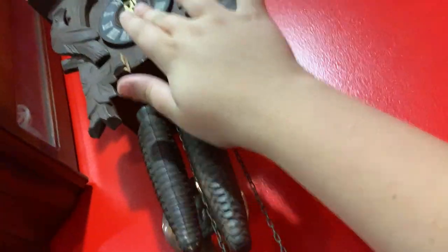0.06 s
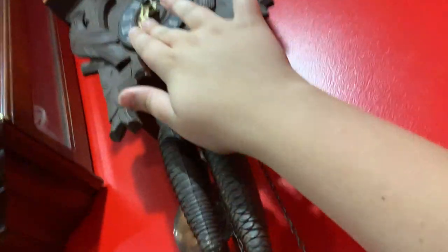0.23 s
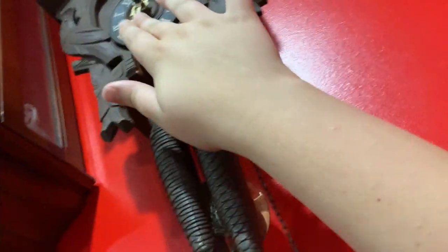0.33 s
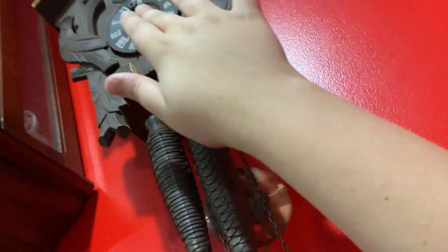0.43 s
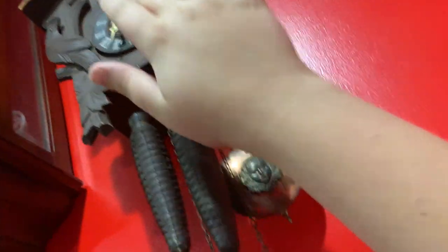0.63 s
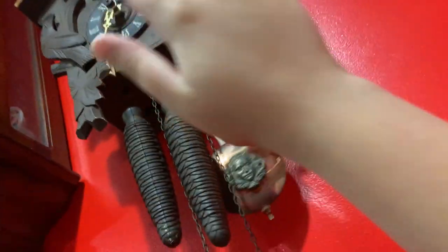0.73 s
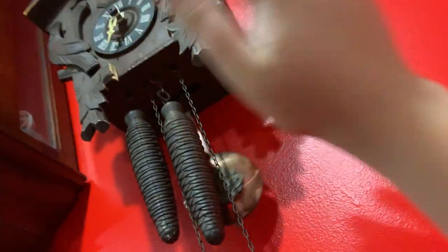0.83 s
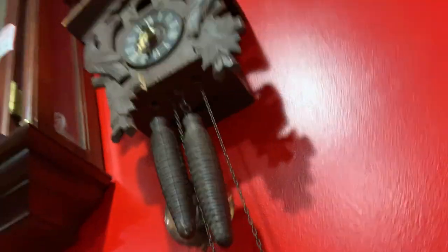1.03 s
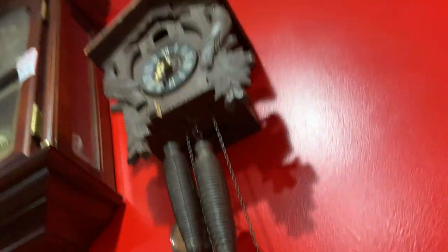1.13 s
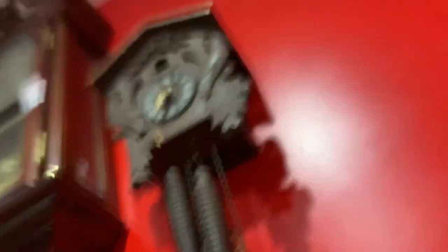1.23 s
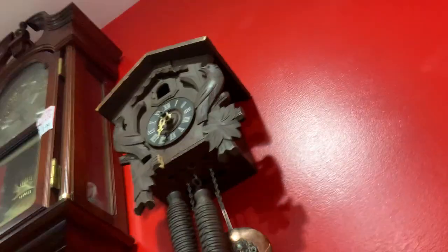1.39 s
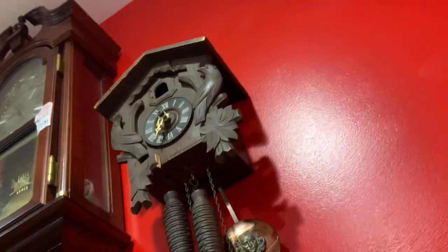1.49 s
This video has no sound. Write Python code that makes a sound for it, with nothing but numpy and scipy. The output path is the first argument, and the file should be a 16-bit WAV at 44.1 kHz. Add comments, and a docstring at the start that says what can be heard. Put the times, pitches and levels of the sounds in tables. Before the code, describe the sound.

A cuckoo clock's chain and wheels whirr and click as its wooden case is handled.

```python
"""Handling a wooden cuckoo clock

In a small quiet room a catch snaps in the case, then chain and wheels run with a bright, grainy
whirr while links and ratchet click unevenly. The case is rubbed and knocked, a metal part pings, and
two dull bumps sound close to the microphone. Impacts are noise bursts and struck modes, friction is
a stream of tiny contacts, and the bumps are falling sines over a rumble."""
import sys
import numpy as np
from scipy import signal
from scipy.fft import rfft, irfft, next_fast_len
from scipy.io import wavfile

SR = 44100
rng = np.random.default_rng(int(sys.argv[2]) if len(sys.argv) > 2 else 0)


def wav_out(sig):
    """Save sig, one row per channel (or a flat mono array), as 16-bit PCM at SR to the path in sys.argv[1]."""
    wavfile.write(sys.argv[1], SR, np.round(np.clip(np.atleast_2d(sig).T, -1, 1) * 32767).astype(np.int16))


N = 68355
T = np.arange(N) / SR
CONTACTS_PER_S, CONTACT_SPREAD_DB = 6000, 3.5
CATCH_SNAPS = [(.2225, -21.5), (.231, -22.5), (0.2659, -36.5)]  # t/s, level/dB


def from_db(db):
    """Decibels to gain."""
    return 10 ** (np.asarray(db) / 20)


def unit_rms(x):
    """Scale to rms 1."""
    return x / np.sqrt(np.mean(x ** 2) + 1e-20)


def colour(x, spectrum):
    """Minimum-phase filter of unit power gain through points (f/Hz, level/dB)."""
    size = 2 * next_fast_len(N)
    hz, db = np.transpose(spectrum)
    bins_hz = np.arange(size // 2 + 1) * SR / size
    gain = unit_rms(from_db(np.interp(np.log(bins_hz + 1), np.log(hz), db)))
    cepstrum = irfft(np.log(gain))
    cepstrum[1:size // 2] *= 2
    cepstrum[size // 2 + 1:] = 0
    return irfft(rfft(x, size) * np.exp(rfft(cepstrum)))[..., :N]


def drift(corner_hz):
    """Smooth random wander, rms 1."""
    r = np.exp(-2 * np.pi * corner_hz / SR)
    return unit_rms(signal.lfilter([1], [1, -2 * r, r * r], rng.standard_normal(2 * N))[N:])


def decay(start_s, t60_s):
    """Step to 1, then exponential fall."""
    return (T >= start_s) * np.exp(-np.log(1000) * np.maximum(T - start_s, 0) / t60_s)


def ring(x, modes):
    """Resonators (f/Hz, level/dB, t60/s) driven by x."""
    out = 0
    for hz, db, t60_s in modes:
        r = np.exp(-np.log(1000) / (t60_s * SR))
        w = 2 * np.pi * hz / SR
        out += signal.lfilter([0, from_db(db) * np.sin(w)], [1, -2 * r * np.cos(w), r * r], x + 1e-18)
    return out


def impulses(events):
    """One impulse per (t/s, level/dB)."""
    return sum(from_db(db) * (np.arange(N) == int(s * SR)) for s, db in events)


def bursts(events, t60_s):
    """One decaying noise burst per (t/s, level/dB)."""
    return rng.standard_normal(N) * sum(from_db(db) * decay(s, t60_s) for s, db in events)


def contacts(per_s, spread_db):
    """Tiny impacts of uneven size at random times."""
    sizes = from_db(spread_db * np.minimum(rng.exponential(1, N), 4))
    return sizes * rng.choice([-1, 1], N) * (rng.random(N) < per_s / SR)


def delay_left(x, lags):
    """Stereo pair, left channel late by (f/Hz, delay/s)."""
    size = 2 * next_fast_len(N)
    hz = np.arange(size // 2 + 1) * SR / size
    delay = np.exp(-2j * np.pi * hz * np.interp(hz, *np.transpose(lags)))
    return np.array([irfft(rfft(x, size) * delay)[:N], x])


def in_room(x, wet_db, t60_s):
    """Treble from the works at one side, lows from the whole case, plus a diffuse tail."""
    works_lag = [(1400, .00107), (2700, .00092), (5850, .00093), (10600, .000802), (15200, .000756)]  # at the left microphone: f/Hz, delay/s
    tail_spectrum = [(450, 6.5), (1000, 3.5), (5000, 0), (8000, -0.5), (11000, -10.5), (16000, -9)]
    split_hz, pan_db = 1150, 0.5
    tail = colour(rng.standard_normal((2, N)) * decay(0.0017, t60_s), tail_spectrum)
    tail /= np.sqrt(np.sum(tail ** 2, axis=1, keepdims=True))
    wet = signal.fftconvolve(x[None], tail, axes=1)[:, :N]
    low = signal.sosfilt(signal.butter(5, split_hz, "low", fs=SR, output="sos"), x)
    high = signal.sosfilt(signal.butter(5, split_hz, "high", fs=SR, output="sos"), x)
    return (low + delay_left(high, works_lag) + from_db(wet_db) * wet) * from_db([[pan_db], [-pan_db]])


def room_noise():
    """Faint low noise, partly common to both channels."""
    spectrum = [(30, 1), (150, 1.5), (500, -10.5), (1000, -13), (3000, -27.5), (15000, -32.5)]  # f/Hz, level/dB
    noise = rng.standard_normal(N) + 1.95 * rng.standard_normal((2, N))
    return from_db(-67.5) * colour(noise, spectrum)


def case_drone():
    """Low, rough hum of the case, lingering after the first snap."""
    spectrum = [(60, -43), (115, -3), (145, 11), (200, -21.5), (600, -39)]  # f/Hz, level/dB
    level = from_db(-50) * decay(CATCH_SNAPS[0][0], t60_s=1.85)
    return level * colour(rng.standard_normal((2, N)), spectrum)


def case_hollow():
    """Fine friction keeps the cavity of the case sounding."""
    envelope = [(.15, -67), (.17, -53.5), (.33, -65.5), (1.1, -62), (1.5, -75)]  # t/s, level/dB
    cavity_modes = [(459.5, 0.72, 0.1), (511, -1.8, 0.066)]  # f/Hz, level/dB, t60/s
    level = from_db(np.interp(T, *np.transpose(envelope))) * (T > envelope[0][0])
    cavity = unit_rms(ring(contacts(CONTACTS_PER_S, CONTACT_SPREAD_DB), cavity_modes))
    return in_room(level * cavity, wet_db=-4.5, t60_s=0.28)


def lever():
    """A small metal lever rings under light taps."""
    taps = [(.012, -56), (.023, -58), (.04, -57), (.14, -69)]  # t/s, level/dB
    modes = [(1163, -4.5, 0.11), (2190, -7.5, 0.044), (1610, 7.5, 0.0017)]  # f/Hz, level/dB, t60/s
    return in_room(ring(impulses(taps), modes), wet_db=-1, t60_s=0.055)


def case_rubs():
    """Short gritty scrapes on the wood."""
    strokes = [(0.159, 0.063, -54.5), (0.591, 0.021, -48), (0.719, 0.031, -39), (0.845, 0.023, -44),
               (1, 0.036, -51.5)]  # t/s, length/s, level/dB
    spectrum = [(150, -35), (330, -7), (540, 6), (750, -14.5), (1050, -2.5), (1400, -14), (2000, -5),
                (4000, -8.5), (15000, -15)]  # f/Hz, level/dB
    rise_s, release_s = 0.0057, 0.0079
    level = 0
    for start_s, length_s, db in strokes:
        rise = np.clip((T - start_s) / rise_s, 0, 1)
        release = np.exp(-np.maximum(T - start_s - length_s, 0) / release_s)
        level += from_db(db) * rise * release
    grit = unit_rms(colour(contacts(per_s=3600, spread_db=6.2), spectrum))
    return in_room(level * grit, wet_db=-6, t60_s=0.15)


def case_knocks():
    """Two dry knocks in quick succession; the second rings a hollow note."""
    hits = [(1.2705, -25.5), (1.275, -34)]  # t/s, level/dB
    spectrum = [(100, -14), (370, -3.5), (750, -12), (1400, -0.5), (1750, -12), (5000, -6), (9000, -11),
                (15000, -17)]  # f/Hz, level/dB
    wood_modes = [(390, -29, 0.055), (349, -38, 0.044), (1500, -31.5, 0.017)]  # f/Hz, level/dB, t60/s
    impact = colour(bursts(hits, t60_s=0.012), spectrum)
    note = ring(impulses([(hits[1][0], 0)]), wood_modes)
    return in_room(impact + note, wet_db=-7, t60_s=0.044)


def metal_ping():
    """A metal part ticks twice: a thin chink, then a lower ring."""
    ticks = [(1.193, -20.5), (1.2, -36)]  # t/s, level/dB
    spectrum = [(350, 0), (700, -11), (1100, -4), (3000, -1.5), (6500, -9), (9800, 10.5), (12000, -8),
                (15500, 9.5)]  # f/Hz, level/dB
    high_modes = [(6120, -22.5, 0.013), (9430, -28, 0.028), (10080, -28, 0.03)]  # f/Hz, level/dB, t60/s
    low_modes = [(1035, -28.5, 0.036), (340, -44, 0.073), (2070, -39, .018)]  # f/Hz, level/dB, t60/s
    clicks = colour(bursts(ticks, t60_s=0.019), spectrum)
    chink = ring(impulses([(ticks[0][0], 0)]), high_modes)
    low_ring = ring(impulses([(ticks[1][0], 0)]), low_modes)
    return in_room(clicks + chink + low_ring, wet_db=-5.5, t60_s=0.22)


def bumps():
    """Soft, close thuds that sink in pitch and leave a rumbling boom."""
    hits = [(0.941, -17, 60.8, 0.0282, 0.13, -17.5), (1.273, -28, 313, 0.0076, 0.1, -44)]  # t/s, level/dB, extra starting pitch/Hz, settling/s, t60/s, relative boom/dB
    rumble_spectrum = [(20, 1.5), (85, 12), (150, -13.5), (300, -3), (1000, -72)]  # f/Hz, level/dB
    rest_hz, attack_s, boom_t60_s = 48.3, 0.0091, 0.89
    left_lag_s, left_db = 0.00092, -2.5
    thuds, booms = 0, 0
    for start_s, db, extra_hz, settle_s, t60_s, boom_db in hits:
        age_s = np.maximum(T - start_s, 0)
        cycles = rest_hz * age_s + extra_hz * settle_s * (1 - np.exp(-age_s / settle_s))
        attack = from_db(db) * np.minimum(age_s / attack_s, 1)
        fall = -np.log(1000) * np.maximum(age_s - attack_s, 0)
        boom = attack * from_db(boom_db) * np.exp(fall / boom_t60_s)
        thuds -= (attack * np.exp(fall / t60_s) + boom) * np.sin(2 * np.pi * cycles)
        booms += boom
    rumble = from_db(-2.5) * booms * colour(rng.standard_normal(N), rumble_spectrum)
    return delay_left(thuds + rumble, [(0, left_lag_s)]) * from_db([[left_db], [0]])


def ratchet():
    """Short, bright, uneven ticks."""
    ticks = [(.165, -53), (.198, -34.5), (.347, -38), (.411, -34), (.6755, -22), (1.302, -29.5),
             (1.338, -34), (1.486, -40), (1.513, -37.5)]  # t/s, level/dB
    spectrum = [(450, -3.5), (750, -13), (1100, -3), (12000, 8), (15500, -3)]  # f/Hz, level/dB
    return in_room(colour(bursts(ticks, t60_s=0.0077), spectrum), wet_db=0, t60_s=0.074)


def catch():
    """A double snap and a faint third set the case and works ringing."""
    spectrum = [(80, -36), (220, -7), (520, 2), (720, -3), (1030, 9), (1350, 0.5), (4000, 4), (15500, -0.5)]  # f/Hz, level/dB
    case_modes = [(337.7, -16, 0.28), (492.6, -22, 0.33), (1090, -28, 0.11), (1736, -7.5, 0.097),
                  (2110, -5.5, 0.053), (3720, 1, 0.17), (6350, 6, 0.021)]  # f/Hz, level/dB, t60/s
    snap = colour(bursts(CATCH_SNAPS, t60_s=0.038), spectrum)
    low_cut = signal.butter(2, 145, "high", fs=SR, output="sos")
    case = signal.sosfilt(low_cut, ring(impulses(CATCH_SNAPS), case_modes))
    return in_room(snap + from_db(-11.5) * case, wet_db=-6, t60_s=0.29)


def chain_whirr():
    """Chain and wheels: dense contacts, sparser brass chinks, single links catching on the wheel."""
    envelope = [(.33, -51.5), (.45, -45.5), (.62, -41.5), (1.05, -42), (1.18, -43), (1.23, -50.5),
                (1.27, -38.5), (1.325, -55.5), (1.365, -46), (1.43, -46.5), (1.46, -53), (1.55, -58.5)]  # t/s, level/dB
    rattle_spectrum = [(60, -15), (280, -6), (480, 1.5), (740, -20), (1100, 2.5), (1380, -15.5), (1600, 3),
                       (2250, -5.5), (2600, -17), (3150, 6), (3900, -3.5), (5100, 2), (5560, 7), (5900, -7),
                       (9700, 3), (10700, -0.5), (15500, -2)]  # f/Hz, level/dB
    brass_modes = [(6435, 1.5, 0.011), (6682, 8, 0.013), (6830, -0.5, 0.03)]  # f/Hz, level/dB, t60/s
    link_hits = [(.455, -28), (.472, -44), (.522, -33), (.574, -52), (.593, -24.5), (.615, -31),
                 (.655, -25.5), (.814, -24), (.837, -27), (.857, -23.5), (.91, -23), (.938, -29),
                 (.958, -24), (.984, -21), (1.017, -26.5), (1.036, -35), (1.078, -26)]  # t/s, level/dB
    start_s, rise_s, flutter_db = 0.324, 0.05, 2.35
    level = from_db(np.interp(T, *np.transpose(envelope)) + flutter_db * drift(corner_hz=108))
    level *= np.clip((T - start_s) / rise_s, 0, 1)
    rattle = unit_rms(colour(contacts(CONTACTS_PER_S, CONTACT_SPREAD_DB), rattle_spectrum))
    chinks = unit_rms(ring(contacts(per_s=860, spread_db=3), brass_modes))
    link_clicks = colour(bursts(link_hits, t60_s=0.0065), rattle_spectrum)
    link_rings = ring(impulses(link_hits), brass_modes)
    chain = from_db(-2) * level * (rattle + chinks) + from_db(-12) * (link_clicks + link_rings)
    return in_room(chain, wet_db=-2, t60_s=0.069)


def scene():
    """Stereo sum of room, mechanism and handling."""
    return (room_noise() + lever() + chain_whirr() + case_hollow() + ratchet() + catch()
            + case_drone() + case_rubs() + metal_ping() + case_knocks() + bumps())


def record(dry):
    """Steep low-pass."""
    cutoff_hz = 15900
    return signal.sosfilt(signal.ellip(12, .1, 80, cutoff_hz, fs=SR, output="sos"), dry)


dry = scene()
out = record(dry)
wav_out(out)
```